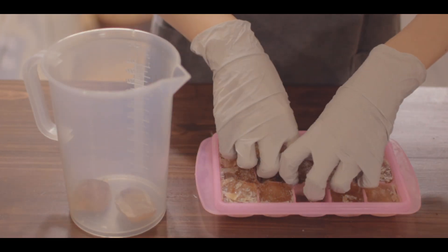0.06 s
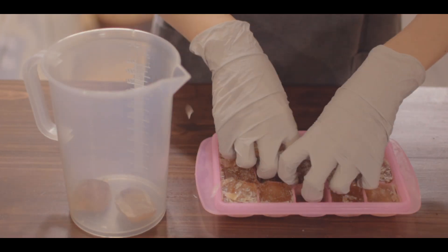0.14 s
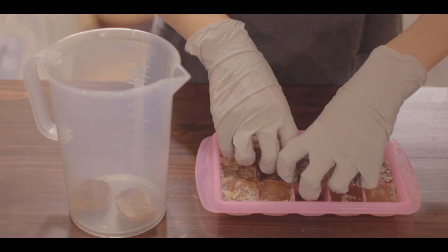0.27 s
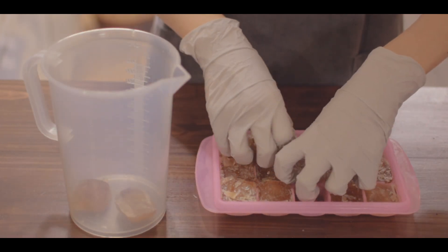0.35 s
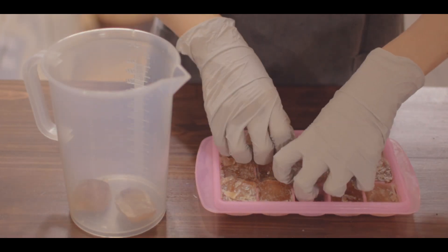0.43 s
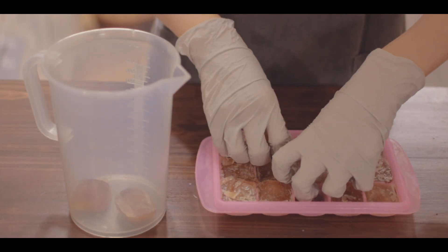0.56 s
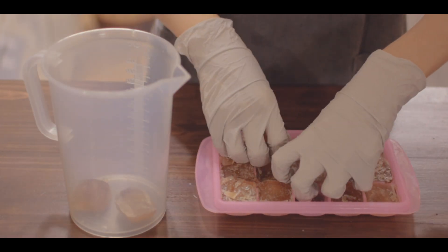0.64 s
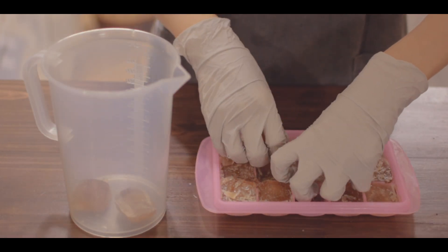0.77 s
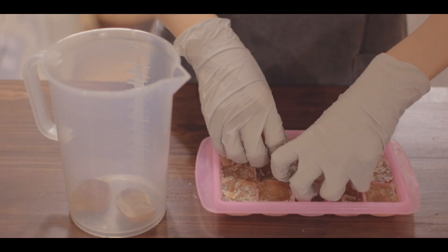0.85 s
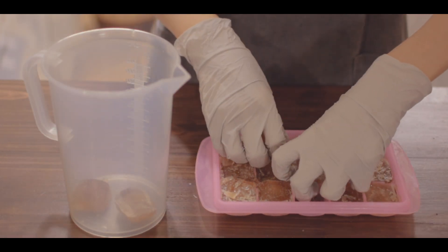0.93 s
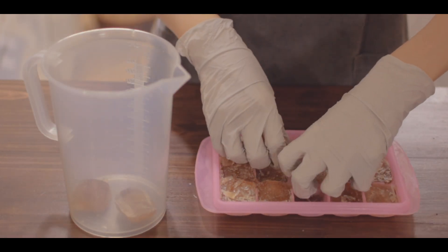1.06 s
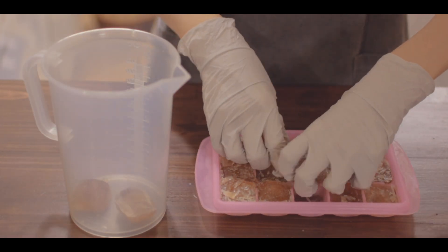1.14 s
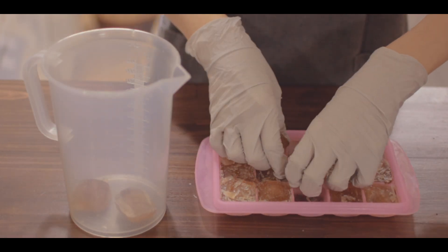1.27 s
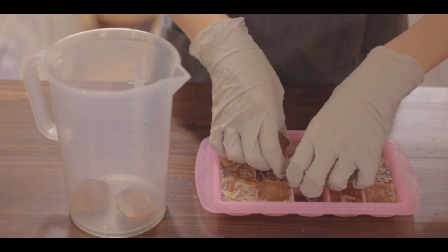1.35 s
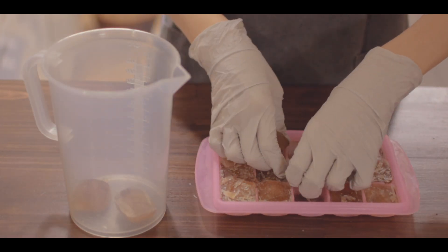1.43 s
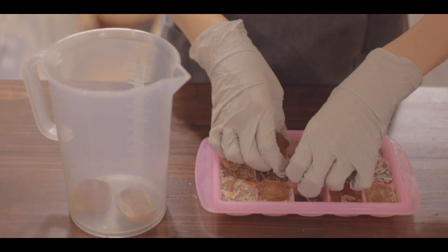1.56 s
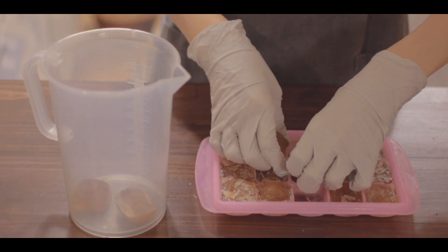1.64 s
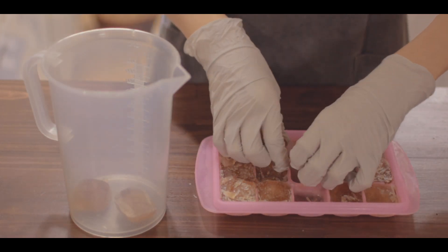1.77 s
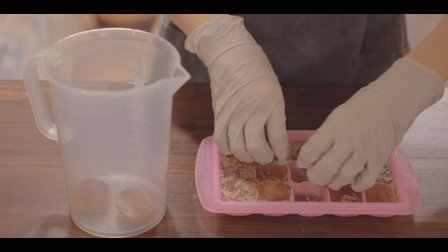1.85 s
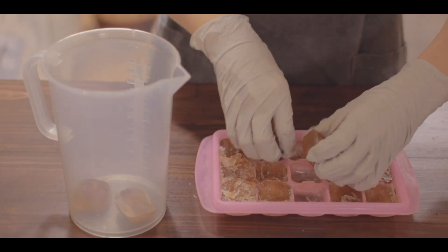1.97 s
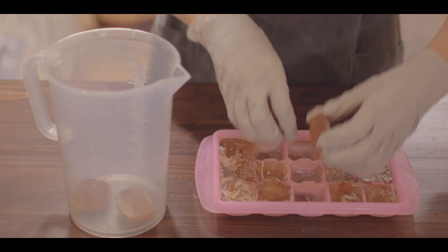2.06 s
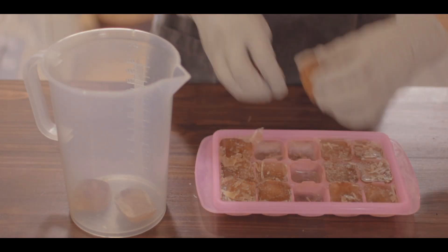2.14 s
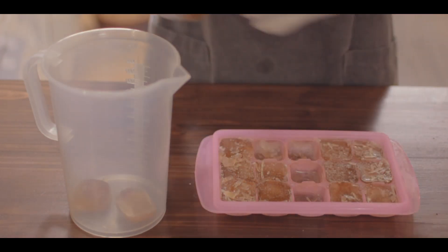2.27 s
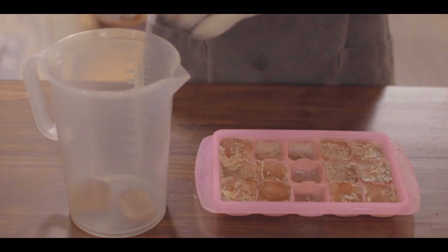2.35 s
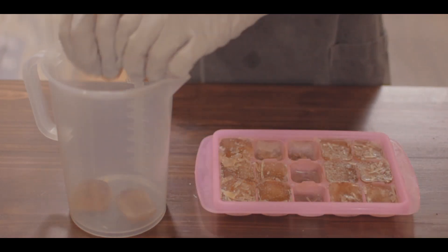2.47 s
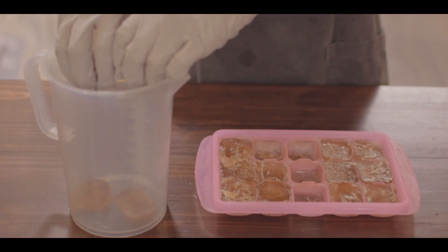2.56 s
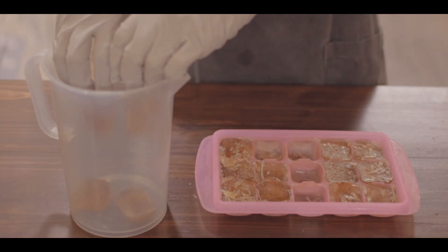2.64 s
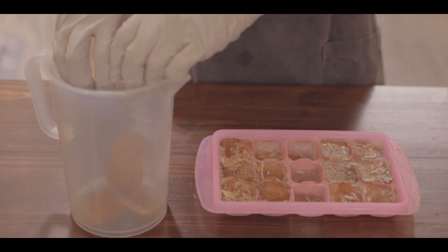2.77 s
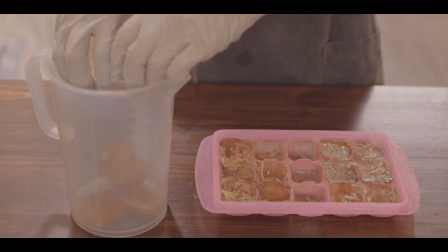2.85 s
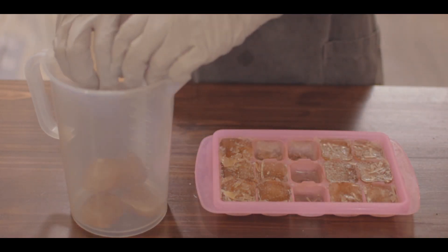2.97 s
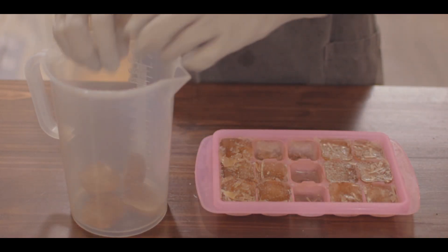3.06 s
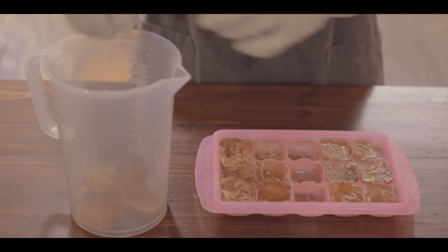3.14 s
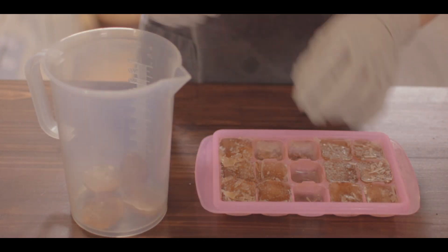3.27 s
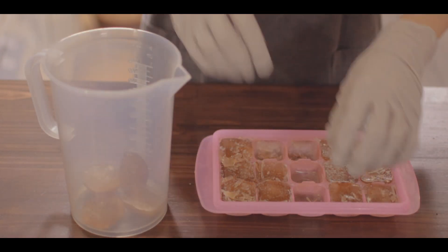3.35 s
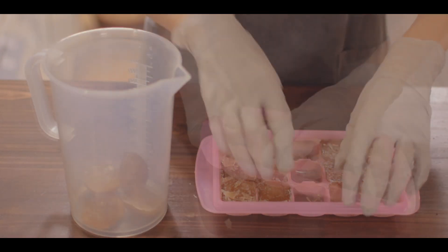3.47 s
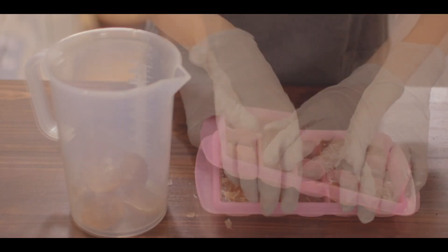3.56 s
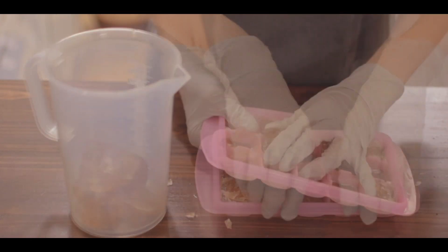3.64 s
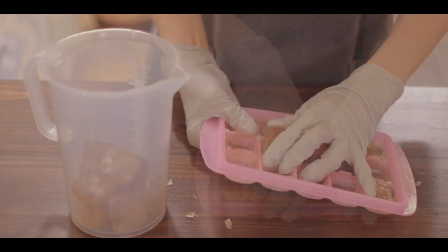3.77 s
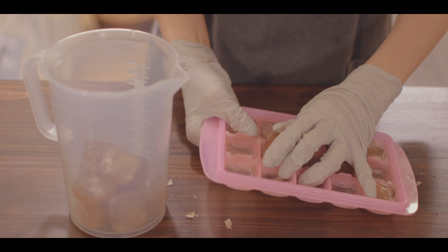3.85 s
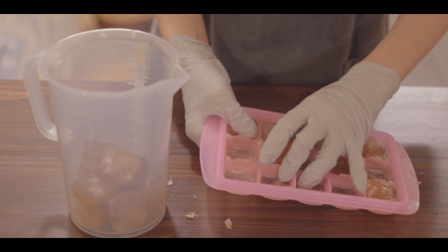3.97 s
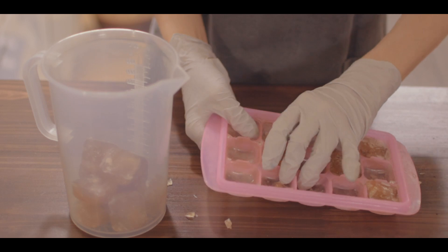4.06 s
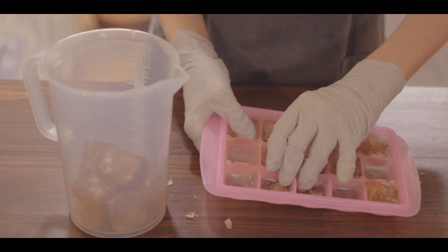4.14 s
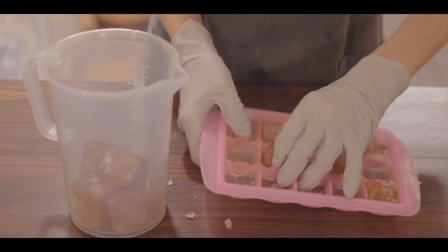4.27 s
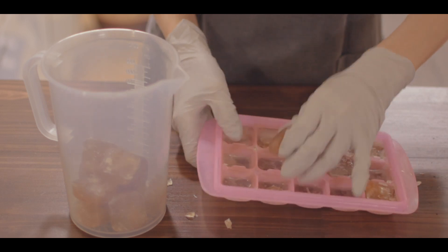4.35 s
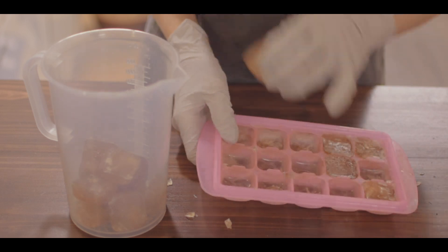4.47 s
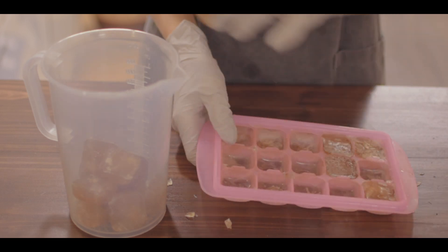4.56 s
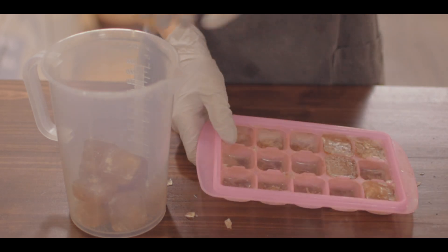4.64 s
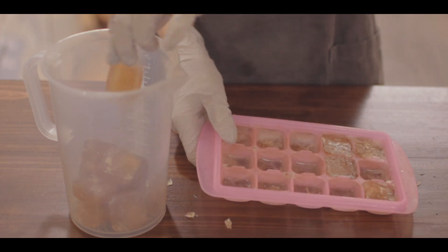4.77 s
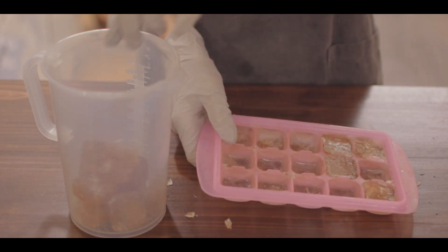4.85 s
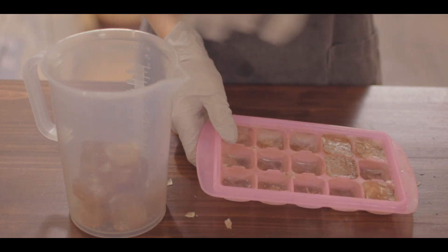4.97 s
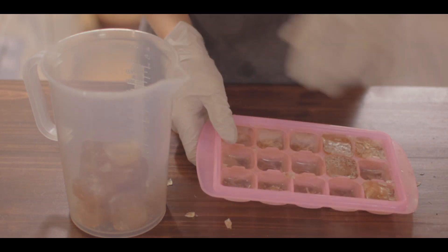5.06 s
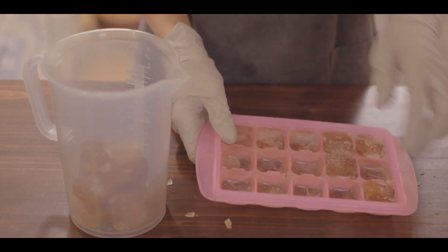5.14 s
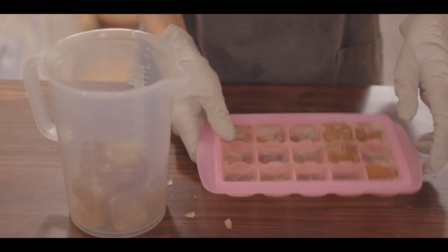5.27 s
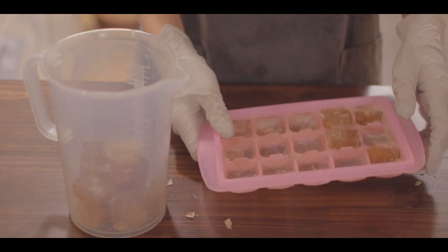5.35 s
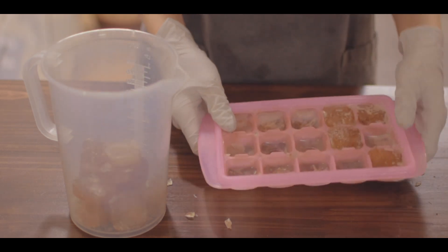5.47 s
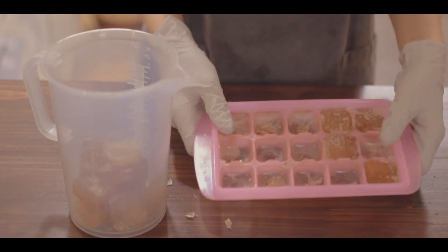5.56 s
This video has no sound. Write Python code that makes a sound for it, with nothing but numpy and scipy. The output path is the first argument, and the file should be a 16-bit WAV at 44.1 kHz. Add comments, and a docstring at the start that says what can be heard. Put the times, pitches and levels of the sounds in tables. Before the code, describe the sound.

Close view of sound in a small quiet room: gloves rub softly on silicone and frosty ice while small cracks tick for over two seconds. A handful of ice cubes then crashes into a plastic jug, rattling and settling within half a second. The tray knocks and briefly squeaks on the wooden table, a firmer double knock follows, and one cube drops into the jug with a lighter clatter.

```python
"""A handful of ice cubes clatters into a plastic jug, and later a single one follows.
Each cube rings the plastic, knocks and cracks; then cubes clink, slide and tap as they come to rest.
Before and between, gloved hands work the frozen cubes out of a silicone tray on a wooden table:
gloves rub in tiny slips, ice ticks in short noise bursts, and the tray knocks, drags and squeaks.
A small room adds its echo and quiet air; a faint hiss differs in the two channels."""
import sys
import numpy as np
from scipy import signal
from scipy.fft import rfft, irfft, next_fast_len
from scipy.io import wavfile

SR = 44100
rng = np.random.default_rng(int(sys.argv[2]) if len(sys.argv) > 2 else 0)


def materialize(psi):
    """Save the field psi as 16-bit PCM at rate SR to the path in sys.argv[1].

    A 1-D psi becomes a single channel; in a 2-D psi each row is a channel.
    """
    bounded = np.clip(np.atleast_2d(psi).T, -1, 1)
    quanta = np.round(bounded * 32767).astype(np.int16)
    wavfile.write(sys.argv[1], SR, quanta)


N = 247391
TIME = np.arange(N) / SR
AGE = TIME[:SR // 5]   # time since a contact
# Levels in the tables are set before the sources are mixed. Colour tables hold relative levels.


def from_db(db):
    """Decibels to gain."""
    return 10 ** (np.asarray(db) / 20)


def rms_one(x):
    """Scale to rms 1."""
    return x / np.sqrt(np.mean(x ** 2) + 1e-20)


def at_hz(points, hz):
    """Read a table on a log-frequency axis."""
    freqs, values = np.transpose(points)
    return np.interp(np.log(np.maximum(hz, 1)), np.log(freqs), values)


def colour(x, spectrum):
    """Causal (minimum-phase) filter with the given spectrum."""
    size = 2 * next_fast_len(len(x))
    log_gain = np.log(from_db(at_hz(spectrum, np.fft.rfftfreq(size, 1 / SR))))
    cepstrum = irfft(log_gain)
    # folding the cepstrum forward puts the response as early as it can be
    cepstrum[1:size // 2] *= 2
    cepstrum[size // 2 + 1:] = 0
    return irfft(rfft(x, size) * np.exp(rfft(cepstrum)))[:len(x)]


def butter(x, hz, kind, order=2):
    """Butterworth filter."""
    sos = signal.butter(order, np.clip(hz, 10, .45 * SR), kind, fs=SR, output="sos")
    return signal.sosfilt(sos, x + 1e-18)


def add(track, s, sound):
    """Mix a sound into a track at time s."""
    start = max(round(s * SR), 0)
    track[start:start + len(sound)] += sound[:N - start]


def at_level(sound, db):
    """Give a short sound the energy of 10 ms at this level."""
    return from_db(db) * sound * np.sqrt(SR / 100 / np.sum(sound ** 2))


def burst(t60):
    """Many close modes dying together: 0.1 s of decaying noise."""
    age = AGE[:SR // 10]
    return rng.standard_normal(len(age)) * from_db(-60 * age / max(t60, 1e-3))


def antinode(mode_hz, favoured_hz, octaves):
    """How squarely a blow meets each mode, 0-1."""
    return np.exp(-(np.log2(mode_hz / favoured_hz) / octaves) ** 2)


def ring(modes, drive_db, scatter_db, detune, rise_cycles):
    """One blow: each mode swells within about a cycle, with its own strength, sign and slight shift."""
    hz, db, t60 = np.transpose(modes)
    strength = from_db(db + drive_db + scatter_db * rng.standard_normal(len(hz)))
    gain = strength * rng.choice([-1, 1], len(hz))
    cycles = np.outer(hz * (1 + detune * rng.standard_normal(len(hz))), AGE)
    swell = 1 - np.exp(-cycles / rise_cycles)
    fade = np.exp(-np.log(1000) * np.outer(1 / t60, AGE))
    return gain @ (np.sin(2 * np.pi * cycles) * swell * fade)


def friction(pressure, spectrum, slips_per_s, size_db, hiss):
    """Rubbing: tiny slips of uneven size, scattered separately in six octave bands, over a smooth hiss."""
    slips = np.zeros(N)
    for hz in np.geomspace(500, 7500, 6):
        at = np.flatnonzero(rng.random(N) < slips_per_s / SR)
        sizes = from_db(size_db * np.minimum(rng.exponential(1, len(at)), 4))
        clicks = np.zeros(N)
        clicks[at] = sizes * rng.choice([-1, 1], len(at))
        slips += butter(clicks, [hz / np.sqrt(2), hz * np.sqrt(2)], "band")
    rough = rms_one(slips) + hiss * rng.standard_normal(N)
    return pressure * rms_one(colour(rough, spectrum))


def strokes(rows):
    """Pressure of the hand: each stroke (start_s, length_s, level_db) swells, holds and lets go."""
    attack_s, release_s = 0.036, 0.017
    pressure = np.zeros(N)
    for s, length, db in rows:
        corners = [s - attack_s, s, s + length, s + length + release_s]
        pressure += from_db(db) * np.interp(TIME, corners, [0, 1, 1, 0])
    return pressure


# Steady hiss: pitch_hz, level_db (per Hz, relative)
HISS_COLOUR = [(20, -43.5), (60, -18.5), (120, -13), (600, 1), (1100, 0), (2000, -3), (4000, -10.5),
               (7000, -18), (9500, -21), (11000, -39.5), (16000, -44)]


def hiss():
    """Smooth filtered noise, separate in each channel."""
    level_db = -76
    noises = rng.standard_normal((2, N))
    return from_db(level_db) * np.array([rms_one(colour(noise, HISS_COLOUR)) for noise in noises])


# Quiet air in the room: pitch_hz, level_db (per Hz, relative)
AIR_COLOUR = [(20, -40.5), (58, -6.5), (82, -23), (125, -4), (160, -10.5), (220, 1.5), (300, -2),
              (520, 1.5), (750, -0.5), (1100, -4), (2000, -12.5), (8000, -33.5), (16000, -47.5)]


def air():
    """Soft filtered noise, the same in both channels."""
    level_db = -70
    return from_db(level_db) * rms_one(colour(rng.standard_normal(N), AIR_COLOUR))


# How long the room's echo takes to fall by 60 dB: pitch_hz, t60_s
ROOM_FADE = [(150, 0.56), (500, 0.46), (1500, 0.41), (4000, 0.2), (8000, 0.086), (14000, 0.07)]


def room_response(build_s):
    """Diffuse reflections that build up quickly and die sooner in the treble; energy 1."""
    age = TIME[:SR * 3 // 4]
    white = rfft(rng.standard_normal(len(age)))
    hz = np.fft.rfftfreq(len(age), 1 / SR)
    centres, t60s = np.transpose(ROOM_FADE)
    tail = np.zeros(len(age))
    for share, t60 in zip(np.eye(len(centres)), t60s):
        band = irfft(white * at_hz(np.c_[centres, share], hz), len(age))
        tail += band * from_db(-60 * age / t60)
    tail *= 1 - np.exp(-(age / build_s) ** 2)
    return tail / np.sqrt(np.sum(tail ** 2))


# The tray dragging over the table: start_s, length_s, level_db
DRAG_STROKES = [(3.925, 0.043, -64), (4.07, 0.028, -72.5)]
# Sound colour of the drag: pitch_hz, level_db
DRAG_TONE = [(200, -32), (500, -9), (1000, 6), (1500, 0), (2200, -9), (16000, -57)]


def drag():
    """The tray scrapes over the table in many small slips and a good share of hiss."""
    return friction(strokes(DRAG_STROKES), DRAG_TONE, slips_per_s=390, size_db=-0.5, hiss=0.65)


# Path of the squeak as the tray drags: time_s, pitch_hz, level_db
SQUEAK_PATH = [(3.901, 543, -85), (3.911, 578, -62.5), (3.926, 607, -70), (3.934, 851, -64),
               (3.944, 940, -65), (3.968, 786, -71), (3.986, 680, -86)]


def squeak():
    """The dragged tray sticks and slips fast enough to sing: a gliding tone with weaker overtones."""
    overtone_db = -12   # each overtone below the one before
    waver_share = 0.016   # unsteadiness as a share of the pitch
    s, hz, db = np.transpose(SQUEAK_PATH)
    waver = 1 + waver_share * rms_one(butter(rng.standard_normal(N), 250, "low"))
    phase = 2 * np.pi * np.cumsum(np.interp(TIME, s, hz) * waver) / SR
    tone = sum(from_db(overtone_db * k) * np.sin((k + 1) * phase) for k in range(3))
    return rms_one(tone) * np.interp(TIME, s, from_db(db), left=0, right=0)


# Glove strokes over ice and silicone: start_s, length_s, level_db, ice_share (0-1)
GLOVE_STROKES = [(0, 0.16, -68, 0.3), (0.235, 0.04, -69.5, 0.66), (0.308, 0.089, -68.5, 0.6),
                 (0.419, 0.058, -72, 0.2), (0.588, 0.058, -68.5, 0.5), (0.913, 0.2, -76, 1),
                 (1.134, 0.032, -65.5, 0.8), (1.245, 0.09, -71, 0.8), (1.43, 0.15, -73.5, 0.2),
                 (1.643, 0.021, -75.5, 0.1), (1.743, 0.038, -71.5, 0.3), (1.824, 0.069, -67, 0.9),
                 (1.897, 0.17, -73.5, 0.55), (3.724, 0.082, -71.5, 0.1), (3.841, 0.072, -68.5, 0.1),
                 (4.038, 0.024, -66, 0.3), (4.343, 0.098, -68.5, 0.6)]
# Sound colour of gloves on silicone: pitch_hz, level_db
SILICONE_COLOUR = [(150, -38), (450, -2), (1200, 12.5), (2500, 6.5), (4500, -8), (6500, -3.5),
                   (9000, -10.5), (10500, -13.5), (16000, -20)]
# Sound colour of gloves on frosty ice: pitch_hz, level_db
ICE_COLOUR = [(300, -18), (1500, 0), (3000, 7), (5500, 9), (9000, 1), (10500, -22), (16000, -39)]


def share_db(share):
    """Power share to decibels, never below 1 percent."""
    return 10 * np.log10(np.clip(share, .01, 1))


def gloves():
    """Gloves rub dully on the silicone and crackle finely on frosty ice."""
    prise_start_s, prise_end_s = 0.18, 2.35   # the fingers prise cubes loose
    resting_db = -80   # gloves shifting on the tray throughout the prising
    resting = strokes([(prise_start_s, prise_end_s - prise_start_s, resting_db)])
    on_silicone = strokes([(s, length, db + share_db(1 - ice)) for s, length, db, ice in GLOVE_STROKES])
    on_ice = strokes([(s, length, db + share_db(ice)) for s, length, db, ice in GLOVE_STROKES])
    rub = friction(on_silicone + resting, SILICONE_COLOUR, slips_per_s=1200, size_db=6.0, hiss=0.26)
    frost = friction(on_ice, ICE_COLOUR, slips_per_s=380, size_db=4.5, hiss=.2)
    return from_db(-3.0) * rub + from_db(-8.5) * frost


# Ringing modes of the loaded tray on the table top: pitch_hz, level_db, t60_s
TRAY_MODES = [(298, -0.5, 0.028), (368, 3, 0.03), (425, 14.5, 0.05), (496, 4.5, 0.034), (593.8, 9.5, 0.063),
              (736, -3, 0.034), (790, -9, 0.06), (980, -5, 0.04), (1140, -14, 0.09)]


def tray_thud(drive_db):
    """A blow on the loaded tray makes its modes ring briefly."""
    return ring(TRAY_MODES, drive_db, scatter_db=1.5, detune=.015, rise_cycles=1)


# Ice cracking and unsticking from its cells: start_s, level_db, centre_hz, t60_s
ICE_TICKS = [(0.0241, -51, 2300, 0.012), (0.1024, -63, 4130, 0.042), (0.263, -62.5, 2700, 0.028),
             (0.344, -70.5, 8500, 0.013), (0.406, -56, 3500, 0.01), (0.553, -59, 1400, 0.029),
             (0.577, -64.5, 4260, 0.046), (0.6273, -59.5, 3540, 0.016), (.902, -68.5, 3000, 0.013),
             (1.2313, -56.5, 4200, 0.0078), (1.327, -67, 3150, .04), (1.437, -70, 3500, 0.013),
             (1.545, -57, 3900, 0.018), (1.8198, -56, 4900, 0.012), (2.0938, -57, 2020, 0.0092),
             (2.105, -66.5, 2000, 0.018), (2.141, -64.5, 2800, 0.017), (2.1797, -61.5, 2930, 0.0084),
             (2.205, -62.5, 2630, 0.015), (2.2889, -53, 1470, 0.017), (2.359, -64, 3250, 0.017),
             (3.866, -66, 7500, 0.012), (4.293, -58, 1840, 0.023), (4.382, -63, 4500, 0.032)]


def ticks(body_db=-6, thud_db=-18):
    """Small fractures: a broad snap peaking at its own pitch, which nudges the tray and sheds splinters."""
    fall_db_per_octave = 13   # above a tick's centre
    splinter_db, splinter_spread_s = -18.5, 0.025   # level relative to the snap
    out = np.zeros(N)
    for s, db, centre_hz, t60 in ICE_TICKS:
        top_db = -fall_db_per_octave * np.log2(SR / 2 / centre_hz)
        spectrum = [(centre_hz / 20, 2 * body_db - 20.0), (centre_hz / 2, body_db),
                    (centre_hz, 0), (SR / 2, top_db)]
        add(out, s, at_level(colour(burst(t60), spectrum), db))
        add(out, s, tray_thud(db + thud_db))
        for delay, size in rng.uniform(0, 1, (3, 2)):
            splinter = colour(burst(t60=.004), spectrum)
            splinter_s = s + splinter_spread_s * (2 * delay - .25)   # a few come just before the snap
            add(out, splinter_s, at_level(splinter, db + splinter_db - 6 * size))
    return from_db(-3.5) * butter(out, 9000, "low", order=4)


# The tray knocking on the table: start_s, thud_db, favoured_mode_hz, slap_db, slap_cutoff_hz
TRAY_KNOCKS = [(0.025, -65, 420, -64, 2000), (1.0407, -57.5, 420, -54.5, 4970),
               (3.624, -64.5, 384, -64.5, 4500), (3.833, -69, 720, -54.5, 3020),
               (3.843, -58, 605, -51, 3980), (3.855, -62.5, 600, -57, 2490), (4.059, -71, 722, -62.5, 4200),
               (4.359, -50.5, 597, -48, 2340), (4.376, -51, 560, -64, 3500), (4.428, -59, 423, -64, 1204),
               (4.434, -63, 720, -66, 1200)]
# Sound colour of the slap: pitch_hz, level_db
SLAP_COLOUR = [(100, -31), (300, -7), (700, 9.5), (1300, 8.5), (2100, 3.5), (2700, -3.5), (5000, -8),
               (8500, -7.5), (12000, -23), (16000, -57)]


def tray(favour_db=5, favour_octaves=.2):
    """Soft silicone damps the blow: a dull thud of the table and a brief slap."""
    thuds, slaps = np.zeros(N), np.zeros(N)
    mode_hz = np.array(TRAY_MODES)[:, 0]
    for s, thud_db, favoured_hz, slap_db, bright_hz in TRAY_KNOCKS:
        spot_db = favour_db * antinode(mode_hz, favoured_hz, favour_octaves)
        add(thuds, s, tray_thud(thud_db + spot_db))
        slap = butter(colour(burst(t60=0.03), SLAP_COLOUR), bright_hz, "low", order=1)
        add(slaps, s, at_level(slap, slap_db))
    return from_db(-5.5) * thuds + slaps


# Cubes sliding in the jug after a drop: start_s, level_db, fade_db_per_s
CUBE_SLIDES = [(2.765, -54, 62.5), (3.123, -77, 110), (4.891, -61.5, 139)]
# Sound colour of the sliding: pitch_hz, level_db
SLIDE_COLOUR = [(300, -22.5), (1500, 5), (3000, 6.5), (5000, 1.5), (7500, -7.5), (9000, -8.5), (11000, -20),
                (16000, -24)]


def grinding():
    """After a drop the cubes slide over each other in a fine crackle that dies away as they settle."""
    motion = np.zeros(N)
    for s, db, fade in CUBE_SLIDES:
        motion += (TIME > s) * from_db(db - fade * np.maximum(TIME - s, 0))
    return friction(motion, SLIDE_COLOUR, slips_per_s=900, size_db=3.5, hiss=.2)


# Cubes striking each other in the jug: start_s, level_db, pitch_hz
CUBE_CLINKS = [(2.7618, -46, 5000), (2.7715, -59, 9870), (2.807, -59.5, 5280), (2.851, -59.5, 5330),
               (3.199, -69, 2620), (3.214, -67, 2680)]


def clinks(overtone_db=-6, snap_db=-4):
    """Cube against cube: a tiny snap and three short, inharmonic modes of the ice."""
    out = np.zeros(N)
    for s, db, hz in CUBE_CLINKS:
        modes = [(hz, 0, .016), (hz * 1.21, overtone_db, .014), (hz * 1.56, 2 * overtone_db, .012)]
        add(out, s, at_level(ring(modes, 0, scatter_db=2, detune=.015, rise_cycles=1), db))
        snap = butter(burst(t60=.012), [hz * .4, hz * 1.5], "band")
        add(out, s, at_level(snap, db + snap_db))
    return out


# Ringing modes of the table under the jug: pitch_hz, level_db, t60_s
TABLE_MODES = [(47.8, -28.5, 0.027), (135, -22, 0.038), (197, -26.5, 0.06)]


def table_thump(drive_db):
    """A blow in the jug shakes the table beneath it."""
    return ring(TABLE_MODES, drive_db, scatter_db=1.2, detune=.02, rise_cycles=.3)


def landing():
    """The weight of the whole handful rocks the table once: a deep thump."""
    out = np.zeros(N)
    add(out, 2.763, table_thump(-17.5))
    return butter(out, 60.3, "low")


# Dense upper modes of ice on plastic: pitch_hz, level_db
CRACK_COLOUR = [(150, -54.5), (600, -27), (1500, 3.5), (2400, 12.5), (3000, 4), (3500, -2), (4900, 0),
                (5700, -1), (6700, -7), (8500, -6), (10500, -19), (13000, -19), (16000, -25.5)]


def crack(pitch_hz, db, peak_db=4, fall_db=-22):
    """Hard contact with a short icy after-ring, lifted at the cube's own pitch and falling above it."""
    snap = colour(burst(t60=0.009) + from_db(-9) * burst(t60=0.045), CRACK_COLOUR)
    cube = [(pitch_hz * .7, 0), (pitch_hz, peak_db), (pitch_hz * 1.3, -3), (pitch_hz * 4, fall_db)]
    return at_level(colour(snap, cube), db)


WALL_HZ = 863   # brightness pivots about this pitch


def octaves_from_pivot(hz):
    """Distance from the pivot pitch, at most one octave either way."""
    return np.clip(np.log2(hz / WALL_HZ), -1, 1)


# The unpitched knock of the wall under a cube: pitch_hz, level_db
CLACK_COLOUR = [(150, -42.5), (400, 2.5), (1450, 1), (1800, -16), (2500, -14), (16000, -67)]


def clack(db, bright_db):
    """The wall buckles for a moment under the cube: a brief, unpitched knock, tilted like the blow."""
    hz, level_db = np.transpose(CLACK_COLOUR)
    spectrum = np.c_[hz, level_db + bright_db * octaves_from_pivot(hz)]
    return at_level(colour(burst(t60=.022), spectrum), db - 10)


# Cubes rocking to rest in fading taps: start_s, length_s, first_tap_db
SETTLING_CUBES = [(3.006, .04, -48), (3.194, 0.039, -61.5), (4.931, .11, -61)]


def settling_taps():
    """Loosely spaced, fading taps of uneven strength, each on its own spot; rows as in CUBE_HITS."""
    gap_s, fade_db_per_s = 0.018, 48
    bright_db_per_octave, crack_db = -1.5, -12   # the crack is relative to the tap
    taps = []
    for start, length, db in SETTLING_CUBES:
        for k, (jitter, size, spot) in enumerate(rng.uniform(-0.924, 1, (16, 3))):
            age = (k + 0.21 * jitter) * gap_s
            tap_db = db - fade_db_per_s * age + 2.3 * size
            bright_db = bright_db_per_octave + 4 * spot
            if age < length:
                taps.append((start + age, tap_db, bright_db, WALL_HZ * 2 ** spot, WALL_HZ / 2 ** spot,
                             tap_db + crack_db))
    return taps


# Cubes hitting the jug. A hit on the bottom is dull, one on the wall bright; each spot favours two
# modes, or one twice over:
# start_s, level_db, brightness_db_per_octave, favoured_mode_hz, next_mode_hz, crack_db
CUBE_HITS = [ (2.509, -61, -11.5, 388, 730, -74), (2.684, -47.5, -11.5, 610, 846, -72),
             (2.7615, -22.5, -0.5, 1560, 1330, -36), (2.7706, -21, -3, 519, 343, -29),
             (2.785, -44, -6.5, 400, 902, -53), (2.796, -40.5, -3, 432, 597, -55),
             (2.8058, -42, -12, 783, 430, -45.5), (2.8335, -37, -9, 1330, 1017, -42.5),
             (2.845, -33, -9, 439, 495, -45), (2.8504, -29.5, 3.5, 782, 1345, -33.5),
             (2.864, -31, -6.5, 846, 603, -44), (2.8785, -36.5, -8.5, 795, 784, -54),
             (2.892, -37, -6, 1330, 780, -41.5), (2.9171, -34.5, -1.5, 1365, 1383, -42.5),
             (2.931, -44.5, 3, 1400, 780, -48), (2.9509, -35, 2, 1559, 1017, -38),
             (2.9613, -39.5, -3.5, 1270, 760, -48), (2.972, -38, 1.5, 785, 1360, -58),
             (2.982, -39.5, 4, 603, 1320, -56), (3.055, -40.5, -2.5, 432, 396, -58),
             (3.064, -36, -5.5, 890, 499, -43), (3.070, -37, -2, 417, 1017, -58),
             (3.095, -43.5, -6, 544, 1017, -57), (3.106, -38.5, -1, 495, 423, -51.5),
             (3.128, -39.5, 0, 561, 1160, -49), (3.1384, -41, 6, 1017, 545, -46.5),
             (3.1439, -40.5, -6, 1160, 1014, -55), (3.158, -50, -8.5, 445, 1300, -47.5),
             (3.2458, -62, 8, 1410, 1170, -65.5), (3.281, -65, 5, 1457, 1310, -69),
             (4.888, -44, 5.5, 545, 545, -42), (4.901, -40.5, 6.5, 545, 545, -47.5),
             (4.918, -46, 4.5, 1327, 550, -45), (4.961, -58, -3, 495, 846, -66),
             (4.982, -57.5, -4, 1422, 606, -77), (4.993, -61.5, 1.5, 1300, 902, -76.5),
             (5.012, -61, 5, 1450, 2240, -69), (5.027, -60, -2, 1459, 1017, -76),
             (5.052, -73.5, -10, 545, 498, -68), (5.108, -70, 5, 1395, 1339, -93)]
# Ringing modes of the jug with ice in it: pitch_hz, level_db
JUG_MODES = [(343, -7), (400, -7), (432, -5.5), (495, -0.5), (545, 3), (603, -3), (644, -3), (722, -11.5),
             (780, -2.5), (846, 0.5), (902, -2), (1017, 0), (1164, -2.5), (1300, 2.5), (1345, 3.5),
             (1422, 0.5), (1459, -0.5), (1559, -4), (1662, -9), (1987, -17.5), (2280, -17), (2536, -13),
             (2750, -14.5), (3100, -12.5)]
# Plastic loses its higher modes sooner: pitch_hz, t60_s
JUG_FADE = [(350, .075), (550, .07), (1000, .055), (1400, .04), (3000, .028)]


def jug(favour_db=10.5, next_favour_db=6, favour_octaves=0.059, forced=0.65, thump_db=-1, thump_low_hz=120):
    """Each cube rings the plastic, thumps the table, cracks, and then jostles its neighbours."""
    body, thumps, cracks = np.zeros(N), np.zeros(N), np.zeros(N)
    mode_hz = np.array(JUG_MODES)[:, 0]
    modes = np.c_[JUG_MODES, at_hz(JUG_FADE, mode_hz)]
    contact = 1 + forced * np.exp(-AGE / 0.0025)   # the wall moves most while the cube still presses on it
    octaves = octaves_from_pivot(mode_hz)
    upper = at_hz([(1550, 0.032), (2100, 0.98)], mode_hz)   # the highest modes follow the crack
    crack_hz, crack_spread_octaves = 3540, 0.17   # each cube cracks at its own pitch
    rebound_db = -22
    for s, db, bright_db, favoured_hz, next_hz, crack_db in CUBE_HITS + settling_taps():
        pitch_hz = crack_hz * 2 ** (crack_spread_octaves * rng.standard_normal())
        drive_db = (1 - upper) * (db + bright_db * octaves) + upper * crack_db
        spot_db = favour_db * antinode(mode_hz, favoured_hz, favour_octaves)
        spot_db += next_favour_db * antinode(mode_hz, next_hz, favour_octaves)
        wall = ring(modes, drive_db + spot_db, scatter_db=1.2, detune=.006, rise_cycles=.45)
        add(body, s, contact * wall)
        add(body, s, clack(db, bright_db))
        add(thumps, s, table_thump(db + thump_db))
        add(cracks, s, crack(pitch_hz, crack_db))
        # two weaker jostles follow, typically about 20 ms later
        for delay, size_db, shift in rng.normal(0, 1, size=(2, 3)):
            later = s + .02 * np.exp(.5 * delay)
            jostle_db = drive_db + rebound_db + size_db
            jostle = ring(modes, jostle_db, scatter_db=3, detune=.02, rise_cycles=.5)
            add(body, later, contact * jostle)
            jostle_crack_db = crack_db + rebound_db + 2 * size_db
            add(cracks, later, crack(pitch_hz * 2 ** (0.5 * shift), jostle_crack_db))
    body = butter(body, 295, "high", order=5)   # thin plastic radiates little bass
    thumps = butter(thumps, thump_low_hz, "high")   # one cube is too light to rock the table
    return from_db(-6.0) * body + from_db(2.0) * thumps + from_db(-2.5) * cracks


def scene():
    """All sources stand in the middle of a small room; only the hiss is wide."""
    clatter = jug() + landing() + clinks() + grinding()
    handling = tray() + ticks() + gloves() + drag() + squeak()
    sent = from_db(-12.0) * clatter + from_db(-11.5) * handling
    room = signal.fftconvolve(sent, room_response(build_s=0.0022))[:N]
    return clatter + handling + room + air() + hiss()


def record(dry):
    """The top is cut steeply above 16.3 kHz."""
    return signal.sosfilt(signal.ellip(10, .1, 80, 16300, fs=SR, output="sos"), dry)


dry = scene()
out = record(dry)
materialize(out)
```